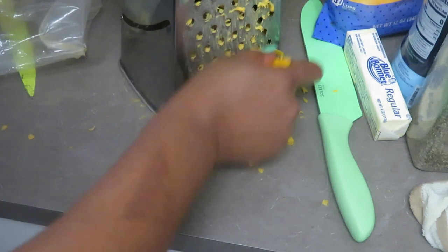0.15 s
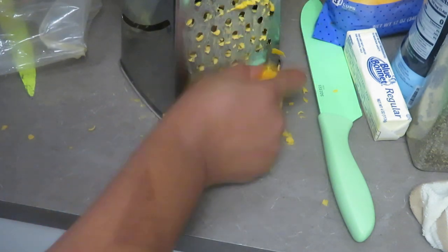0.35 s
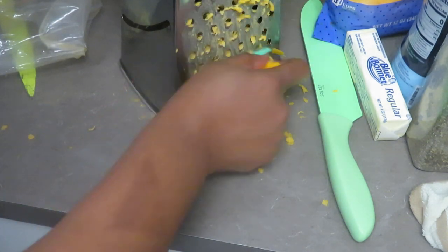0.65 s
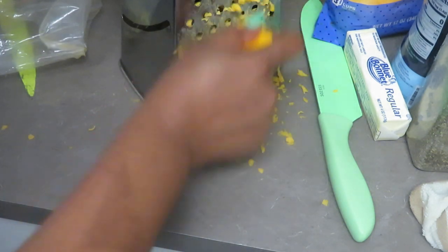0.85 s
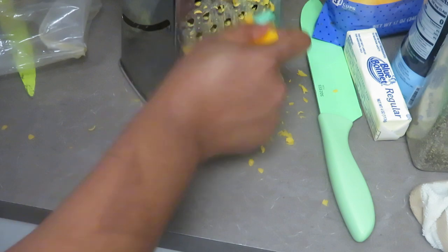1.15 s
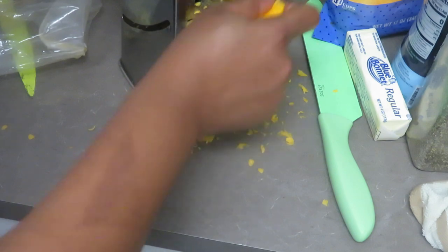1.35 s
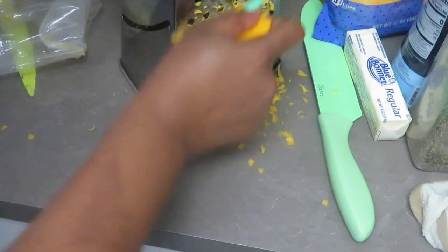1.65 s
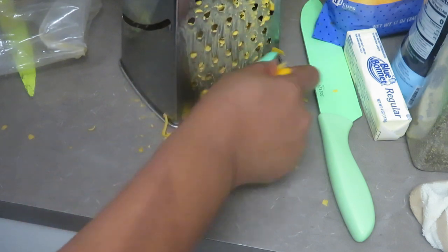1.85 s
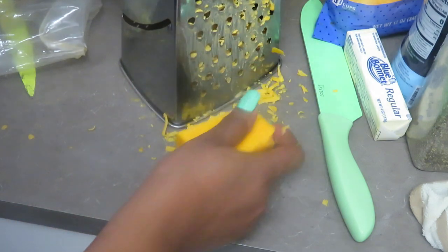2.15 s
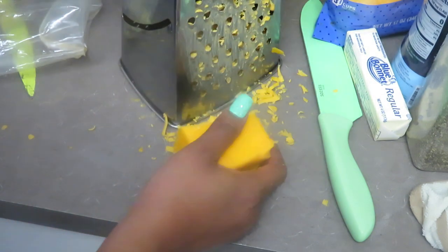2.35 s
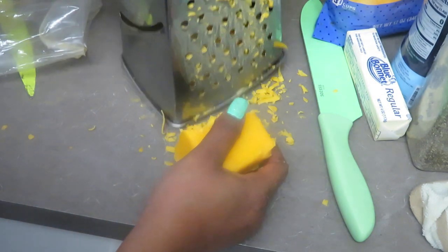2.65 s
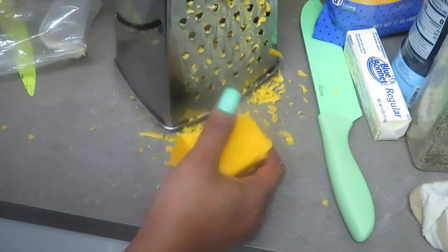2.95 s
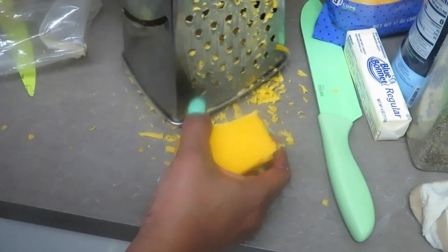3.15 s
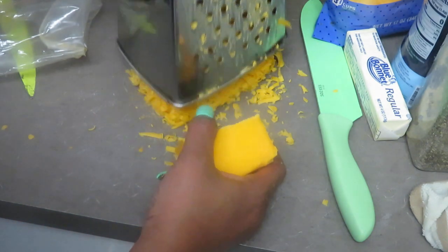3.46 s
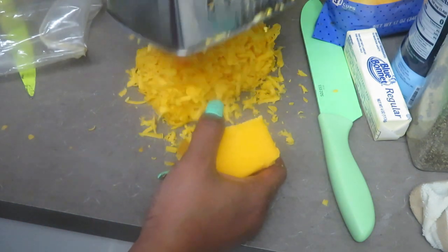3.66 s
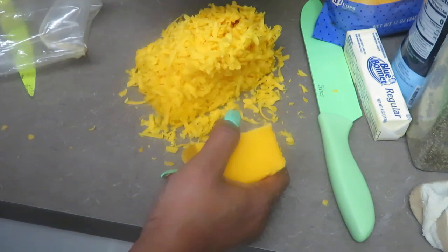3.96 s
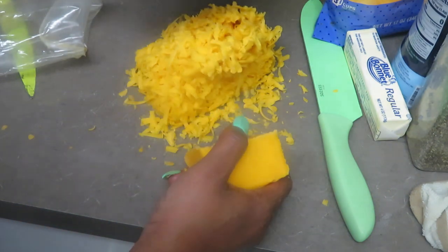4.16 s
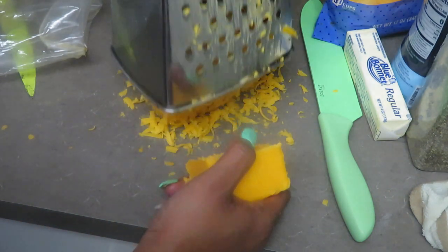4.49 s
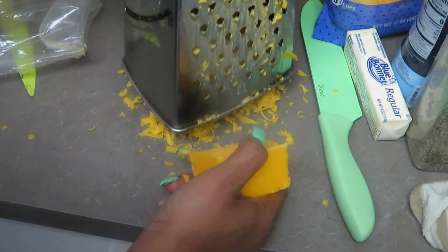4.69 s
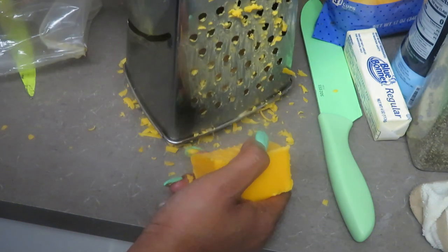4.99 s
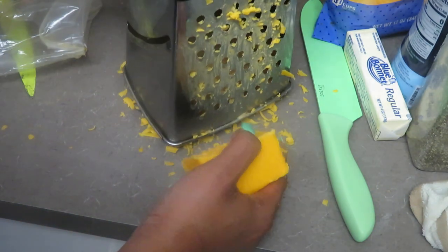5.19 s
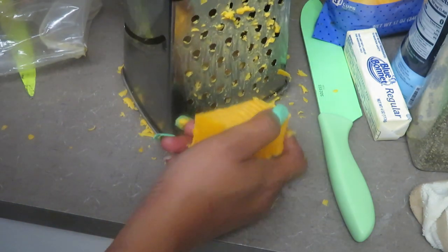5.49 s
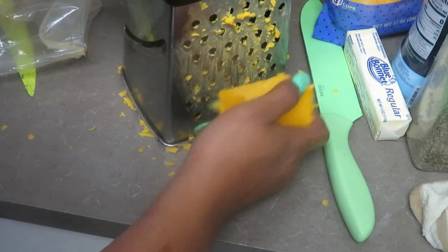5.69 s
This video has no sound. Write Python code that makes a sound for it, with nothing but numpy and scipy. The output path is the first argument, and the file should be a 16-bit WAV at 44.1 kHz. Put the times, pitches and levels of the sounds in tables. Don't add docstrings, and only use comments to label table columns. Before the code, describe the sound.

Close, nearly centred pickup of grating on a counter: dull board thuds with hollow sheet-metal rattle, faint sticky rubbing strokes between them. A rapid clatter and scrape lead to two loud metal clangs around three seconds; the background dips briefly, then returns. A quiet stretch of droning appliance follows, broken by a delicate settling tick and finally brief dull and bright scrapes. Small room with short reverberation.

```python
import sys
import numpy as np
from scipy import signal
from scipy.fft import rfft, irfft
from scipy.io import wavfile

SR = 44100
rng = np.random.default_rng(int(sys.argv[2]) if len(sys.argv) > 2 else 0)


def waveform_to_disk(signal):
    frames = np.transpose(np.atleast_2d(signal))
    scaled = np.clip(frames, -1, 1) * 32767
    samples = np.round(scaled).astype(np.int16)
    wavfile.write(sys.argv[1], SR, samples)


def nominal_scale(level):
    x = np.asarray(level, float) / 20
    return 10 ** x


N = 257103
UNEVEN_DB = 2.5


def rms_one(x):
    return x / np.sqrt(np.mean(x ** 2) + 1e-20)


def at_hz(points, hz, column=1):
    points = np.array(points)
    return np.interp(np.log(hz + 1e-9), np.log(points[:, 0]), points[:, column])


def band(x, low_hz, high_hz, order=2):
    return signal.sosfilt(signal.butter(order, [low_hz, high_hz], "band", fs=SR, output="sos"), x)


def coloured(spectrum):
    hz = np.arange(N // 2 + 1) * SR / N
    white = rfft(rng.standard_normal(N))
    return rms_one(irfft(white * nominal_scale(at_hz(spectrum, hz)), N))


def ring(force, hz, t60_s):
    r = nominal_scale(-60 / (t60_s * SR))
    w = 2 * np.pi * hz / SR
    return signal.lfilter([0, np.sin(w)], [1, -2 * r * np.cos(w), r * r], force + 1e-18)


def bell_db(hz, centre_hz, octaves):
    return -6 * (np.log2(hz / centre_hz) / octaves) ** 2


# start_s, depth_db
DUCKS = [
    (2.67, 5.5),
    (2.8, 6.5),
    (3.12, 7),
]


def gain_db():
    rest_db, duck_s, hold_s, recover_db_per_s = 0.58, 0.066, 0.11, 9.5
    t = np.arange(N) / SR
    ducked = sum(db * (1 - np.exp(-np.maximum(t - s, 0) / duck_s)) for s, db in DUCKS)
    back = recover_db_per_s * np.maximum(t - DUCKS[-1][0] - hold_s, 0)
    return rest_db - np.maximum(ducked - back, 0)


def struck(times_s, blow_db, modes, spread_db, centre_hz=None, octaves=1, either_sign=False):
    at = (np.array(times_s) * SR).astype(int)
    chance = rng.standard_normal((len(at), len(modes)))
    blow_db = blow_db - gain_db()[at]
    sign = np.ones(chance.shape)
    if either_sign:
        sign = rng.choice([-1, 1], chance.shape)
    out = np.zeros(N)
    for k, (hz, level_db, t60_s) in enumerate(modes):
        colour_db = 0 if centre_hz is None else bell_db(hz, centre_hz, octaves)
        clicks = np.zeros(N)
        clicks[at] = sign[:, k] * nominal_scale(blow_db + level_db + colour_db + spread_db * chance[:, k])
        out += ring(clicks, hz, t60_s)
    return out


def burst(times_s, level_db, t60_s, low_hz, high_hz, order=1):
    at = (times_s * SR).astype(int)
    spikes = np.zeros(N)
    spikes[at] = nominal_scale(level_db - gain_db()[at])
    fade = signal.lfilter([1], [1, -nominal_scale(-60 / (t60_s * SR))], spikes + 1e-18)
    return band(fade * rng.standard_normal(N), low_hz, high_hz, order)


def grains(per_s, size_db):
    sizes = nominal_scale(size_db * np.minimum(rng.exponential(1, N), 4)) * rng.choice([-1, 1], N)
    return rms_one(sizes * (rng.random(N) < per_s / SR))


# freq_hz, density_db_per_hz
AIR = [(13, -43), (22, -34), (54, -4.5), (70, -1), (124, -12), (268, -8.5), (299, -22), (383, -4),
       (532, -16.5), (594, -14), (1030, -22), (1690, -24), (5970, -37.5), (13600, -52), (15600, -46)]
# freq_hz, width_hz, level_db
ROOM_MODES = [(48.6, 27, -50), (78, 6.1, -44), (104, 8.9, -47), (127.6, 2.6, -56), (170.9, 11.6, -43),
              (218.3, 7.5, -41.5), (265, 8.5, -39), (357.8, 29, -45), (372.2, 3.2, -54.5),
              (409.4, 4.9, -47), (616.6, 13.7, -50.5)]


def appliance():
    motor_hz, motor_db = 59.2, -39
    out = nominal_scale(-35.5) * coloured(AIR)
    for hz, width_hz, db in ROOM_MODES:
        out += nominal_scale(db) * rms_one(ring(rng.standard_normal(N), hz, 3.17 / width_hz))
    return out + nominal_scale(motor_db) * np.sqrt(2) * np.sin(2 * np.pi * motor_hz * np.arange(N) / SR)


# freq_hz, density_db_per_hz
AIR_SIDE = [(13, -73), (22, -38), (43, -32), (80, -34), (114, -8.5), (416, 1), (532, -4), (947, -5),
            (1250, -12), (1690, -11), (1930, -11.5), (12500, -20), (15600, -23)]


def air_side():
    return nominal_scale(-51) * coloured(AIR_SIDE)


# freq_hz, t60_s, level_db
KITCHEN_T60 = [(149, 0.25, -6), (400, 0.25, -5), (750, 0.33, 8.5), (1190, 0.33, 1.5), (2500, 0.48, -6),
               (5960, 0.31, -7.5), (14000, 0.13, -4)]


def kitchen(x):
    mid_db, side_db, onset_s = -8.5, -15, 0.00087
    t = np.arange(SR // 2) / SR
    tails = 0
    for low_hz in 120 * 2. ** np.arange(0, 7, .5):
        read_hz = 1.2 * low_hz
        level_db = at_hz(KITCHEN_T60, read_hz, column=2) - 60 * t / at_hz(KITCHEN_T60, read_hz)
        noise = band(rng.standard_normal((2, len(t))), low_hz, np.sqrt(2) * low_hz)
        tails = tails + nominal_scale(level_db) * np.clip(t / onset_s, 0, 1) * noise
    tails = tails / np.sqrt(np.sum(tails[0] ** 2)) * nominal_scale(np.array([[mid_db], [side_db]]))
    mid, side = signal.fftconvolve(x[None], tails, axes=1)[:, :N]
    return mid, band(side, 4100, 18000, order=1)


# start_s, level_db
CABINET_THUDS = [
    (.0005, -23.5),
    (0.488, -18),
    (1.584, -23.5),
]
# freq_hz, level_db, t60_s
BOOM = [(47, -0.5, 0.29)]


def cabinet():
    return band(struck(*np.transpose(CABINET_THUDS), BOOM, spread_db=5), 11, 100)


# start_s, counter_low_db, counter_high_db, counter_centre_hz, steel_db
KNOCKS = [(.0005, -13, -19, 362, -24.5), (.478, -11, -16, 370, -16), (0.499, -44, -29, 370, -26),
          (0.709, -45, -28.5, 400, -27), (0.846, -34, -24, 377, -41), (0.974, -28, -26.5, 400, -32),
          (1.226, -32, -25.5, 406, -25.5), (1.265, -40, -28, 400, -32), (1.575, -14, -15.5, 392, -20),
          (1.594, -26, -27.5, 400, -35), (1.627, -47, -44, 400, -44), (1.877, -22.5, -10, 400, -14.5),
          (1.895, -19, -16, 418, -22), (2.557, -39, -16, 360, -30), (2.570, -22, -12.5, 362, -31),
          (2.582, -23, -13, 368, -26), (2.605, -19, -7.5, 400, -33), (2.616, -21, -10.5, 400, -14),
          (2.799, -6, 0, 364, -9), (2.813, -12.5, -21.5, 384, -25), (3.12, -14, -0.5, 411, -6),
          (3.127, -42, -21, 366, -45)]
# freq_hz, level_db, t60_s
COUNTER_LOW = [(174, 1.5, 0.15), (227, -0.5, 0.093)]
# freq_hz, level_db, t60_s
COUNTER_HIGH = [(349, 2.5, 0.044), (382.1, 4.5, 0.079), (459, 2.5, 0.057), (494.4, 6, 0.041)]
# freq_hz, level_db, t60_s
STEEL = [(544, 4.5, 0.056), (633, -11, 0.33), (790, 6, 0.029), (816, 2, 0.012), (935, 1.5, 0.026),
         (1000, -27, 0.029), (1125, 6, 0.035), (1307, 7.5, 0.029), (1570, 9.5, 0.011), (1516, 4, 0.032),
         (1693, 5.5, 0.058), (1800, 9.5, 0.015), (1920, -16, 0.025), (2114, -5.5, 0.093),
         (2310, -1.5, 0.044), (2700, 0, 0.041), (2560, -5.5, 0.054), (2880, -8, 0.095), (3190, 7, 0.019),
         (3464, -9, 0.065), (3860, -1, 0.068), (4120, 6, .03), (4230, 2.5, 0.018), (5340, 9, .03),
         (6100, -5, .02)]


def knocks():
    s, low_db, high_db, board_hz, steel_db = np.transpose(KNOCKS)
    octaves_per_db = 0.13
    steel_hz = 950 * 2 ** (octaves_per_db * (steel_db - high_db))
    board = struck(s, low_db - 4.5, COUNTER_LOW, spread_db=7.0)
    board += struck(s, high_db - 5, COUNTER_HIGH, spread_db=-2.5, centre_hz=board_hz, octaves=0.18)
    steel = struck(s, steel_db - 10, STEEL, UNEVEN_DB, centre_hz=steel_hz, octaves=1.0, either_sign=True)
    crunch = burst(s, steel_db + 2, 0.047, 590, 1830, order=3)
    return band(board, 187, 664, order=3) + band(steel, 550, 1440) + crunch


# start_s, level_db, centre_hz
RIM_TICKS = [
    (4.662, -29.5, 2990),
    (4.673, -32, 3020),
    (4.691, -35.5, 2820),
    (4.718, -41, 2750),
]
# freq_hz, level_db, t60_s
RIM = [(2700, 4, 0.043), (2750, 8, 0.03), (2980, -5, 0.047), (3010, 1, 0.041), (3050, 4.5, 0.033),
       (3400, -14, 0.024)]


def rim():
    s, tick_db, tick_hz = np.transpose(RIM_TICKS)
    return band(struck(s, tick_db - 11.5, RIM, UNEVEN_DB, tick_hz, octaves=0.13), 1800, 3300)


# start_s, steel_db, centre_hz, crack_db, fine_crack_db
TICKS = [(.0005, -34, 2500, -30.5, -23), (1.873, -17.5, 2560, -24, -41), (1.878, -28, 2200, -25, -38),
         (1.8957, -14.5, 2670, -20, -47), (2.375, -31.5, 1900, -38, -53), (2.604, -28, 2000, -44, -53),
         (2.616, -30, 2170, -47, -52), (2.64, -20.5, 3180, -9, -34), (2.684, -15, 3020, -17.5, -36),
         (2.8, -19, 1500, -26.5, -45), (3.12, -13, 2430, -18.5, -26), (4.663, -52, 3100, -32.5, -29),
         (5.62, -29, 1870, -41, -51), (5.635, -31, 1720, -46, -52), (5.716, -16, 2500, -30, -49),
         (5.812, -15, 2500, -26, -43)]


def ticks():
    s, steel_db, centre_hz, crack_db, fine_db = np.transpose(TICKS)
    brief = [(hz, level_db, .4 * t60_s) for hz, level_db, t60_s in STEEL]
    steel = struck(s, steel_db - 6.0, brief, UNEVEN_DB, centre_hz, octaves=0.5, either_sign=True)
    shiver = burst(s, steel_db - 21, 0.15, 2300, 4700, order=2)
    crack = burst(s, crack_db, 0.022, 4100, 6180)
    fine_crack = burst(s, fine_db - 14, 0.011, 6500, 14000)
    return band(steel, 990, 5200) + shiver + crack + fine_crack


# start_s, length_s, peak_db, centre_hz, hiss_db
SCRAPES = [
    (1.869, 0.059, -32.5, 1800, -33),
    (2.641, 0.0084, -24, 2400, -44),
    (2.678, 0.12, -22, 2670, -36.5),
    (2.955, 0.027, -52, 1800, -62),
    (2.996, 0.052, -49.5, 1800, -54),
    (3.073, 0.13, -49.5, 1520, -53),
    (5.621, 0.039, -30.5, 1580, -57),
    (5.719, 0.018, -28.5, 2120, -42),
    (5.755, 0.048, -30.5, 2270, -44),
    (5.809, 0.013, -32, 2500, -45),
]


def scrape_force(level_db):
    rise_share, rise_db, fade_db_per_s = 0.2, 6, 281
    force = np.zeros(N)
    for (start_s, length_s, *_), db in zip(SCRAPES, level_db):
        first = int(start_s * SR)
        rise_s = rise_share * length_s
        part = force[first:first + int(length_s * SR)]
        t = np.arange(len(part)) / SR - rise_s
        part += nominal_scale(db + np.minimum(rise_db * t / rise_s, -fade_db_per_s * t))
    return force


def scrapes():
    db, centre_hz, hiss_db = np.transpose(SCRAPES)[2:]
    catches = [grains(3000, size_db=4) for _ in range(4)]
    steel = np.zeros(N)
    for k, (hz, level_db, t60_s) in enumerate(STEEL):
        force = scrape_force(db + level_db + bell_db(hz, centre_hz, octaves=0.56))
        steel += ring(force * catches[k % 4], hz, .4 * t60_s)
    hiss = band(scrape_force(hiss_db) * grains(9000, size_db=2.5), 3000, 5800, order=1)
    return (nominal_scale(-21.5) * band(steel, 630, 7200) + hiss) / nominal_scale(gain_db())


# middle_s, level_db
STROKES = [
    (.13, -44.5),
    (.52, -41),
    (1.1, -44),
    (1.3, -44),
    (1.6, -44),
    (2.04, -49.5),
    (2.55, -51),
]


def pressure_db():
    fall_db, half_s, resting_db, lift_s = 12, 0.19, -56, 3.4
    t = np.arange(N) / SR
    swells = [db - fall_db * ((t - s) / half_s) ** 2 for s, db in STROKES]
    return np.where(t < lift_s, np.maximum(np.max(swells, axis=0), resting_db), -np.inf)


def rubbing():
    pressure = nominal_scale(pressure_db())
    force = pressure * grains(900, size_db=5.5)
    modes = COUNTER_HIGH + STEEL[:9]
    body = sum(ring(force, hz, t60_s) * nominal_scale(level_db) for hz, level_db, t60_s in modes)
    smear = band(pressure * grains(3000, size_db=8), 2100, 3400)
    return nominal_scale(-36.5) * band(body, 150, 2500) + smear


def scene():
    near = cabinet() + knocks() + rim() + ticks() + scrapes() + rubbing()
    wet_mid, wet_side = kitchen(near)
    mid = near + wet_mid + appliance()
    lean = nominal_scale(-33.5) * mid + 0.43 * np.gradient(near)
    side = wet_side + air_side() - lean
    return np.array([mid + side, mid - side])


def top_cut(x):
    return signal.sosfilt(signal.butter(12, 15750, fs=SR, output="sos"), x)


def record(dry):
    cutoff_hz = 15900
    x = np.clip(dry * nominal_scale(gain_db()), -1.0, 1.0)
    x = signal.sosfilt(signal.cheby2(10, 60, cutoff_hz * 1.03, fs=SR, output="sos"), x)
    return top_cut(x)


dry = scene()
out = record(dry)
waveform_to_disk(out)
```